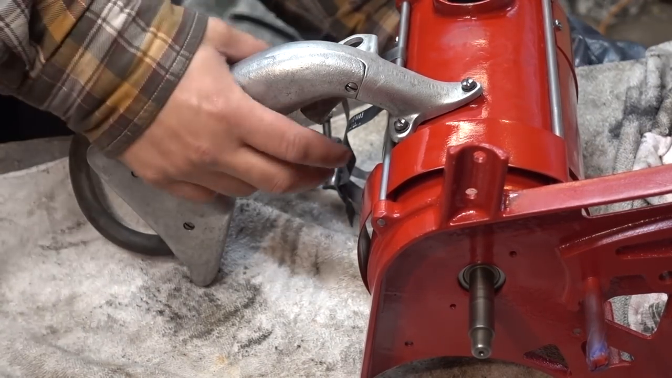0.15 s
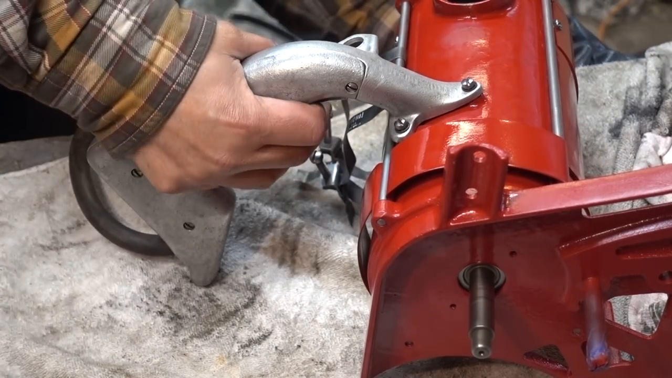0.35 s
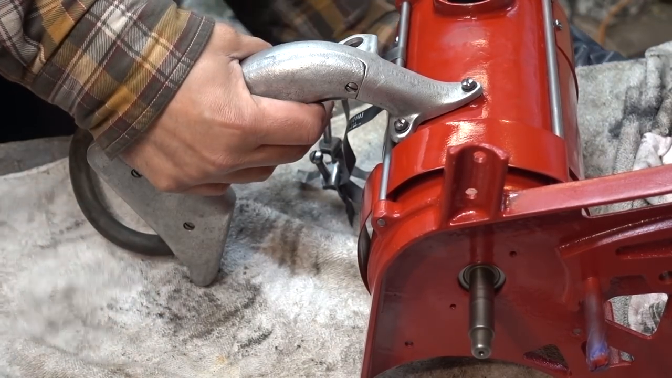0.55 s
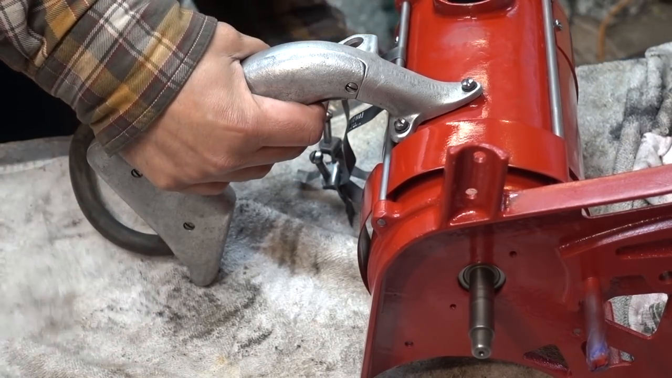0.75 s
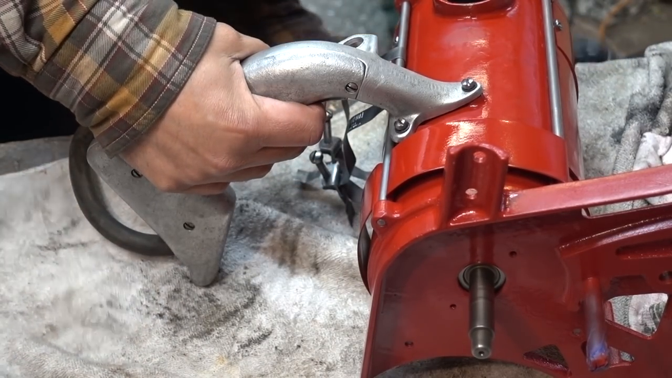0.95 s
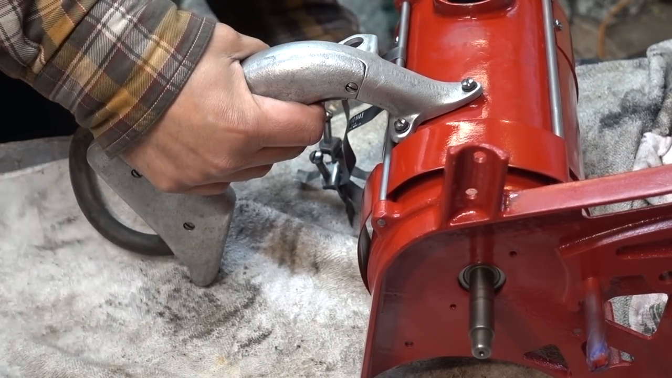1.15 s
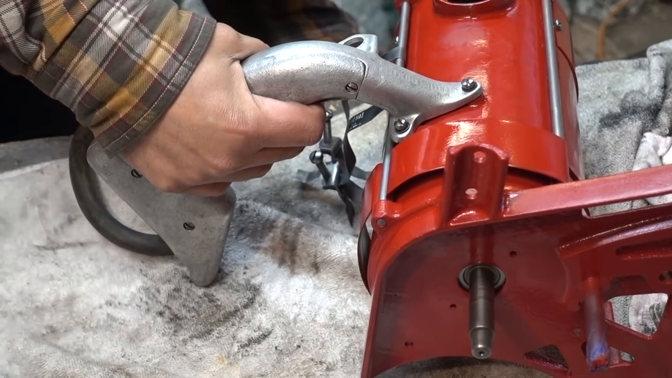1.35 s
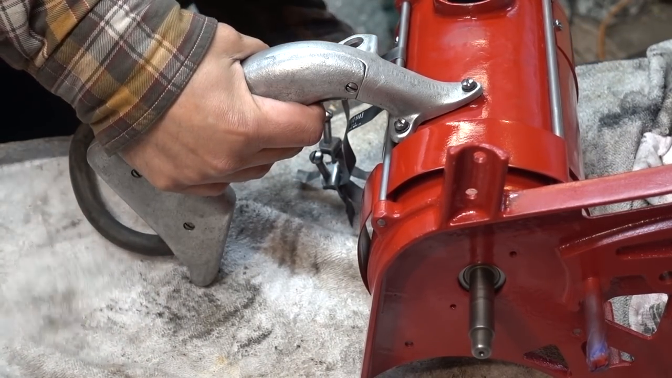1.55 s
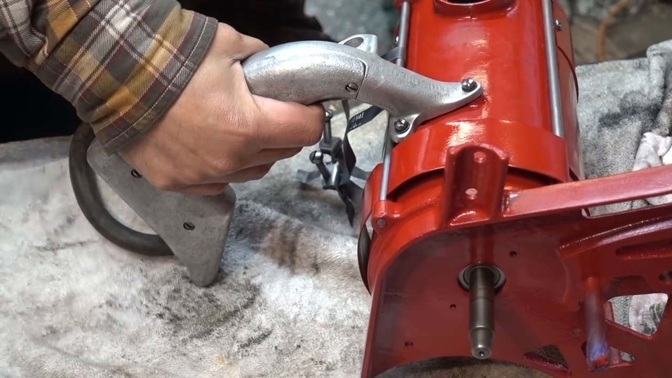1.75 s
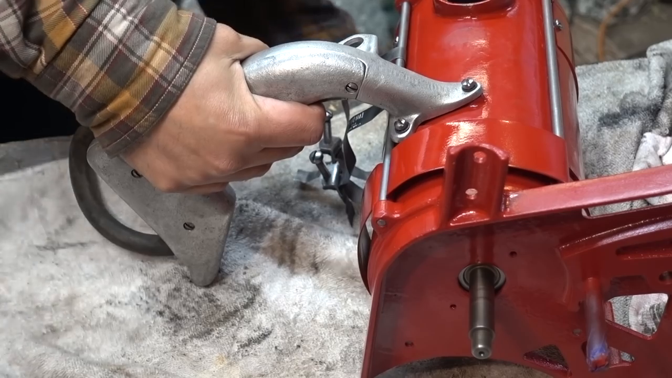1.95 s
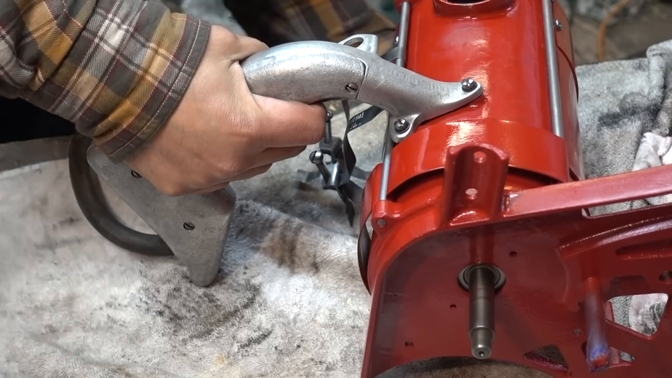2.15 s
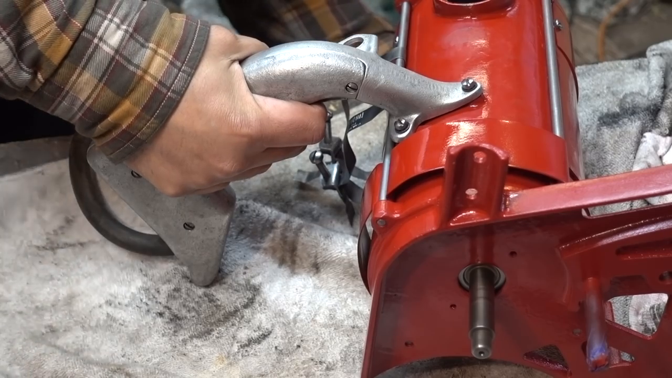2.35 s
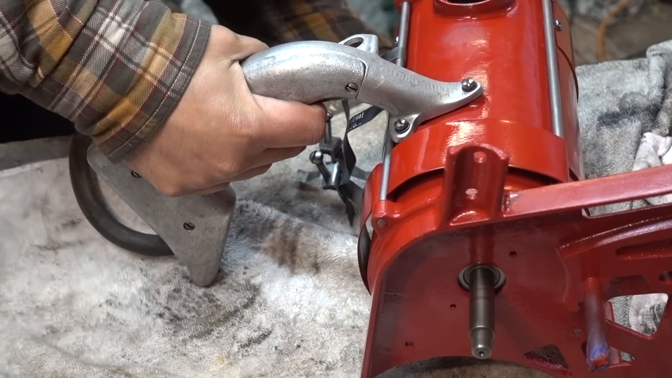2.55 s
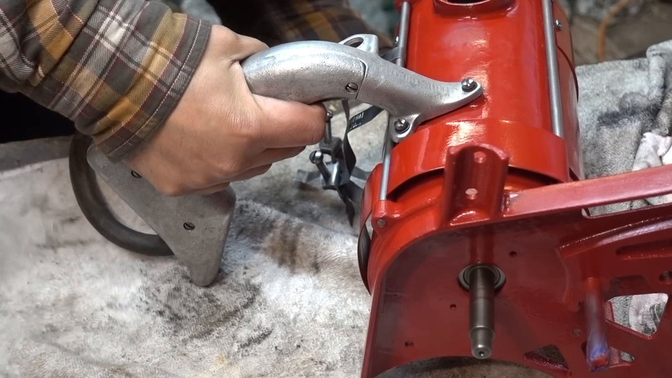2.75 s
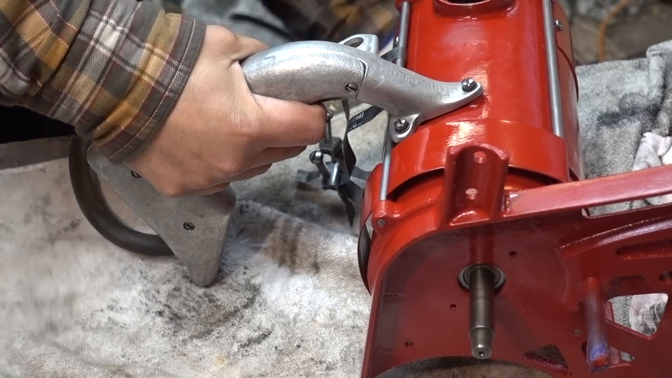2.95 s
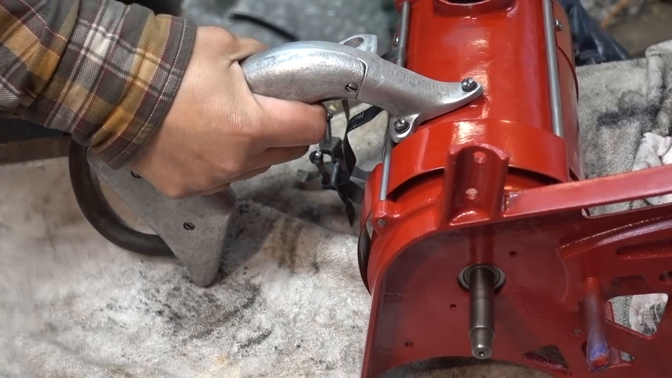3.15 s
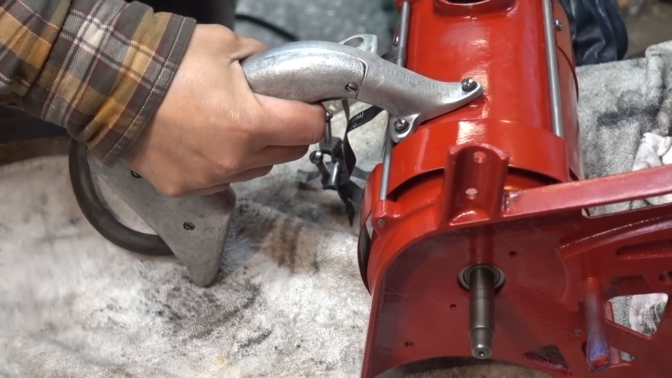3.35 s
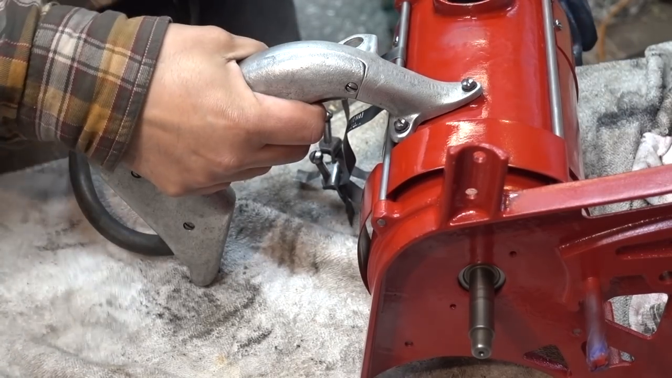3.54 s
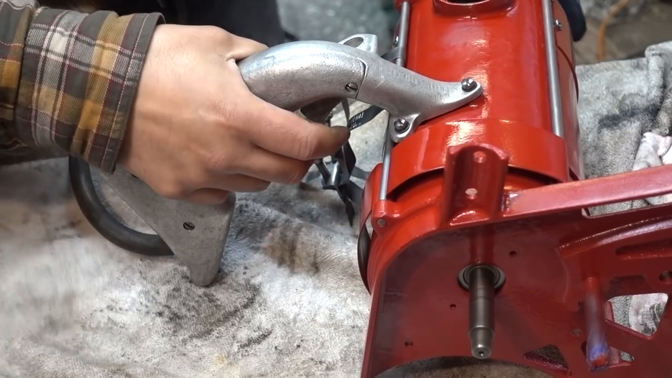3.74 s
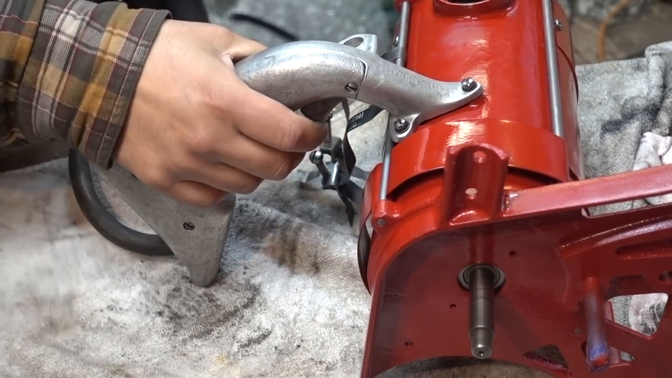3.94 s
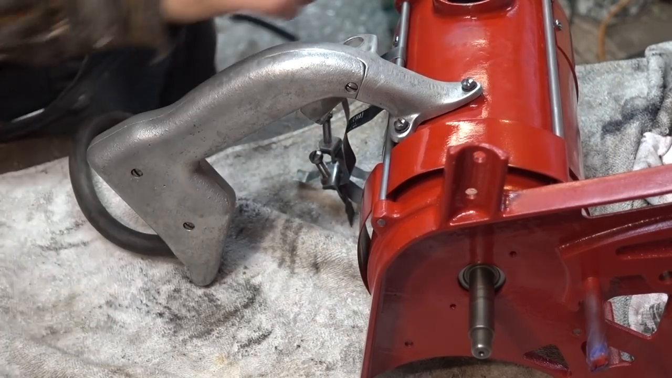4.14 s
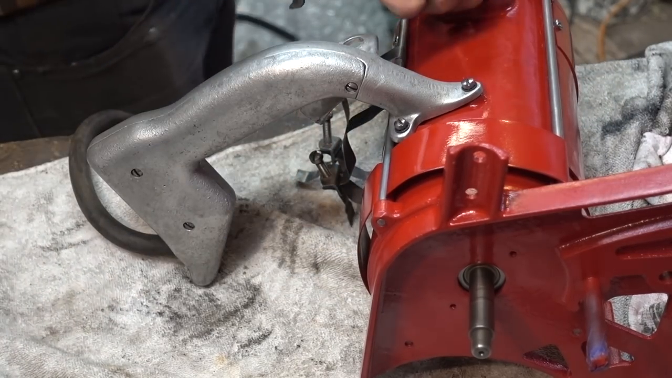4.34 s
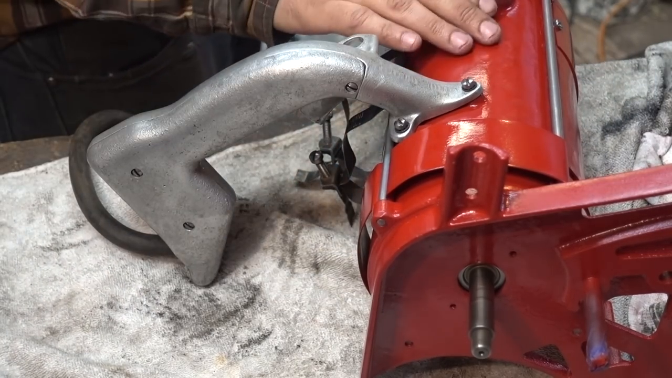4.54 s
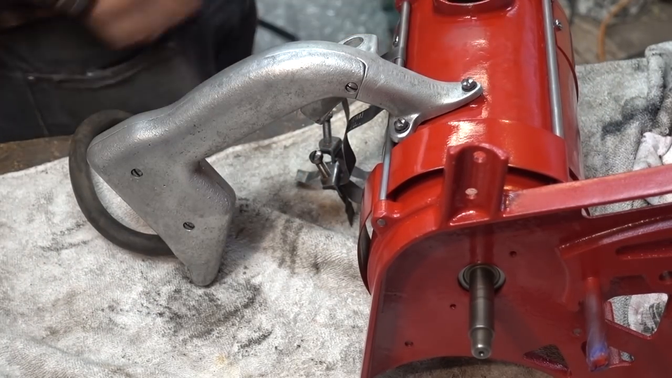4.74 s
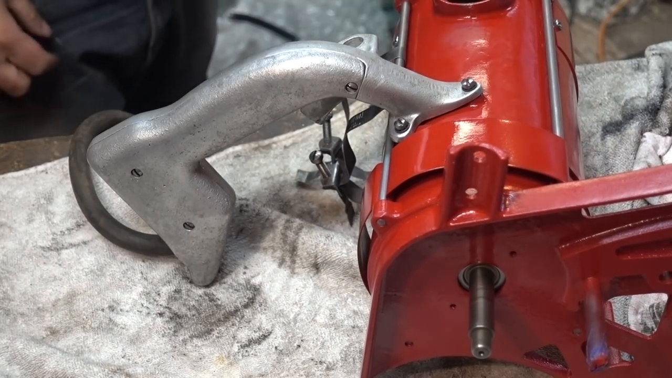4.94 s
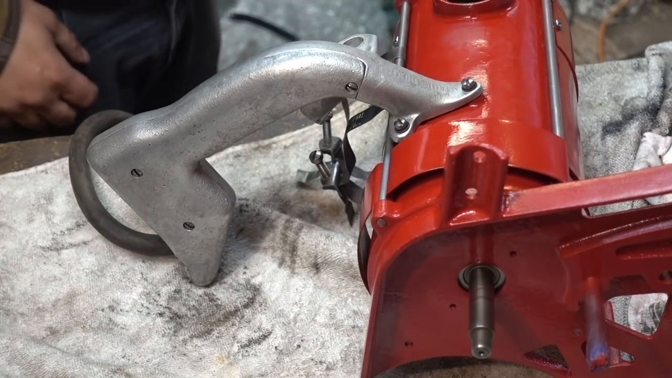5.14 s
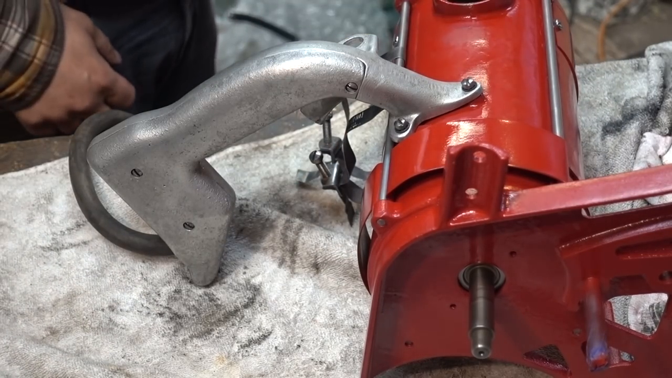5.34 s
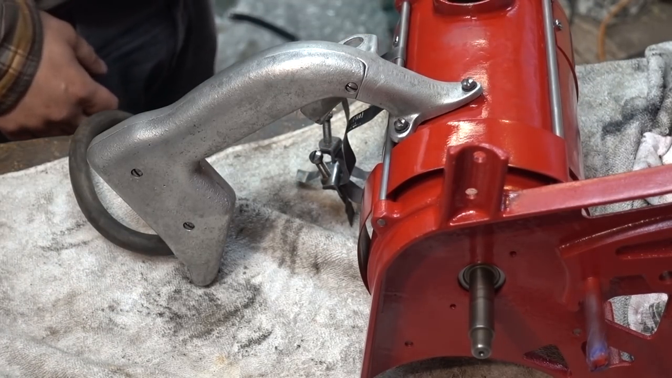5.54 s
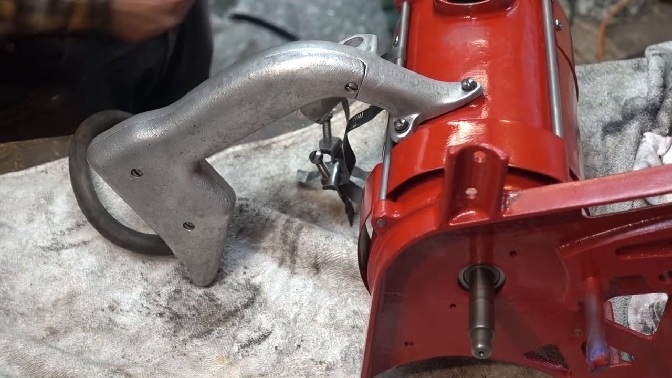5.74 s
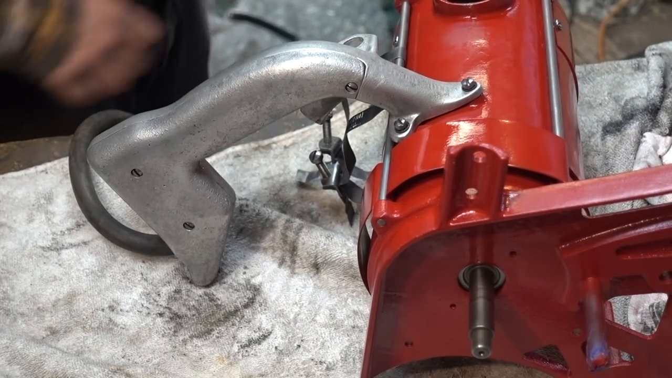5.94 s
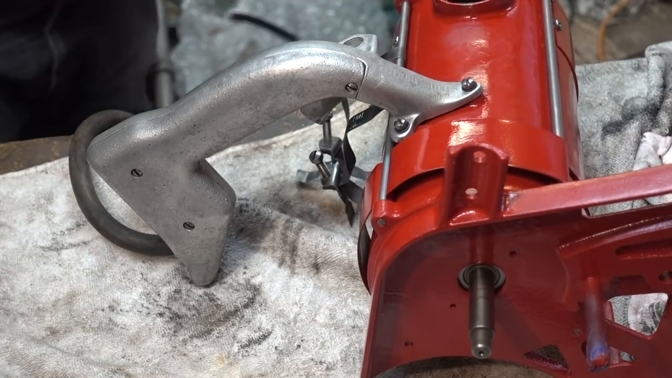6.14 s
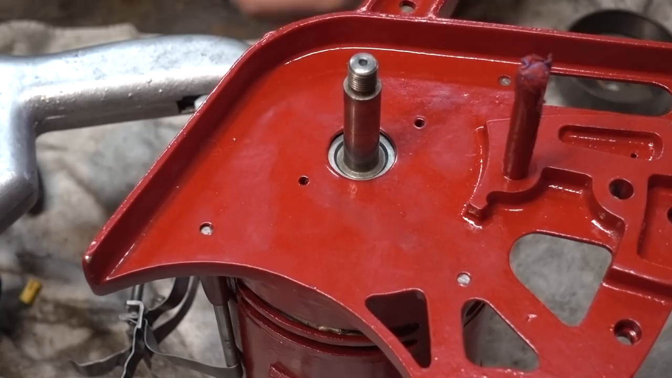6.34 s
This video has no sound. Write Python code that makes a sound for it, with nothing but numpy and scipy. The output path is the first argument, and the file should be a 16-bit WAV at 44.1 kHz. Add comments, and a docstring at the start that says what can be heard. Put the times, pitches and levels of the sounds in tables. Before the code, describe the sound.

Heard close up in a workshop, an electric chainsaw motor with no chain whirrs, briefly dropping in pitch, then climbs quickly to a steady whistling whine. Air blows from the vents and the brushes hiss and faintly crackle over a light rumble. The switch snaps softly open and the motor winds down, falling and fading, until the sound stops abruptly with a small, very high tick.

```python
"""Workshop bench, close by: the bare motor of an electric chainsaw. It is coasting when the trigger is
squeezed, spins up to a steady whine, winds down on release and cuts off; two tiny high ticks follow.
The ten-bladed cooling fan whistles through the resonances of housing and bench, air rushes from the
vents, carbon brushes hiss, spark and sing on the commutator, and the bearings rumble."""
import sys
import numpy as np
from scipy import signal
from scipy.fft import rfft, irfft, next_fast_len
from scipy.io import wavfile
from scipy.ndimage import uniform_filter1d

SR = 44100
rng = np.random.default_rng(int(sys.argv[2]) if len(sys.argv) > 2 else 0)


def to_wav(sig):
    """Store sig (one row per channel, or 1-D mono) as 16-bit WAV at the path in sys.argv[1].

    Samples outside -1..1 are clipped; the rate is SR.
    """
    pcm = np.clip(np.atleast_2d(sig), -1, 1) * 32767
    pcm = np.round(pcm).astype(np.int16)
    wavfile.write(sys.argv[1], SR, pcm.T)  # frames by channels


N = 286209
TIME = np.arange(N) / SR
ON_S, OFF_S, STOP_S = 0.42, 3.705, 6.358  # current on, current off, motor sound ends
TOP_RPS = 206.31  # top speed when cold, turns/s

# air rush spectrum: f/Hz, level/dB
RUSH_SPECTRUM = [(30, -63), (70, -39), (130, -49), (250, -10.5), (430, -8.5), (570, 3), (680, -1), (900, 1),
                 (1000, 3.5), (1110, 4), (1260, -13), (1600, -5.5)]
# brush hiss spectrum: f/Hz, level/dB
HISS_SPECTRUM = [(1800, -17), (2700, -15), (3200, -6), (3900, 1), (4600, -2.5), (5600, -4), (7000, -4.5),
                 (8600, -12.5), (10200, -13), (12000, -21.5), (15500, -31)]
# resonances of the motor's brush end: f/Hz, width/Hz, gain/dB, pan/dB
END_CAP_MODES = [(360, 14, -4, -7.5), (845, 45, -8, -2), (1420, 110, -1, 1.5), (1587, 55, 9, 0),
                 (1742, 62, 9.5, -2.5), (2124, 87, 7.5, -0.5), (2354, 81, 1, -2), (2920, 530, -15.5, -9),
                 (3920, 170, -2.5, 3), (4820, 510, -6, -10.5), (5510, 430, -12, 18.5),
                 (6340, 220, -11.5, -1.5), (9800, 200, -12.5, -1)]


def from_db(db):
    """Decibels to gain."""
    return 10 ** (np.asarray(db) / 20)


def rms_one(x):
    """Scale to rms 1."""
    return x / np.sqrt(np.mean(x ** 2) + 1e-20)


def tone(cycles):
    """Sine of rms 1."""
    return np.sqrt(2) * np.sin(2 * np.pi * cycles)


def butterworth(x, order, edge_hz, kind):
    """Causal Butterworth filter."""
    return signal.sosfilt(signal.butter(order, edge_hz, kind, fs=SR, output="sos"), x)


def in_time(rows):
    """One curve per column, interpolated over the times in the first."""
    times_s, *columns = np.transpose(rows)
    return [np.interp(TIME, times_s, column) for column in columns]


def panned(pan_db):
    """Stereo gains for a left-minus-right level."""
    return from_db(np.array([[.5], [-.5]]) * pan_db)


def by_speed(rps, full_db, knee_rps, power):
    """Level in dB: amplitude rises as a power of speed, flat above the knee."""
    return full_db - 5 * power * np.log10(1 + (knee_rps / rps) ** 4)


def drift(rate_hz, hop=40):
    """Smooth random curve of rms 1."""
    knots = rng.standard_normal(N // hop + 2002)
    pole = np.exp(-2 * np.pi * rate_hz * hop / SR)
    slow = signal.lfilter([1], [1, -2 * pole, pole * pole], knots)[2000:]
    return np.interp(np.arange(N) / hop, np.arange(len(slow)), rms_one(slow))


def coloured(spectrum):
    """Stereo noise of rms 1 from (f/Hz, level/dB) points; mono in the bass."""
    # likeness of left and right: f/Hz, correlation
    likeness = [(100, 1), (500, 1), (1000, 0.96), (2000, 0.91), (4000, 0.46), (8000, 0.48), (15000, 0.32)]
    size = next_fast_len(N)
    log_hz = np.log(np.fft.rfftfreq(size, 1 / SR) + 1)
    curves = np.transpose(spectrum), np.transpose(likeness)
    level_db, alike = (np.interp(log_hz, np.log(hz), values) for hz, values in curves)
    below = np.maximum(np.log(spectrum[0][0]) - log_hz, 0)
    above = np.maximum(log_hz - np.log(spectrum[-1][0]), 0)
    mid, side = rfft(rng.standard_normal((2, size))) * from_db(level_db - 41 * (below + above))
    stereo = np.sqrt(1 + alike) * mid + np.sqrt(1 - alike) * side * [[1], [-1]]
    return rms_one(irfft(stereo, size)[:, :N])


def resonate(x, modes):
    """Parallel resonances, each radiating in its own direction."""
    out = np.zeros((2, N))
    for hz, width_hz, gain_db, pan_db in modes:
        r = np.exp(-np.pi * width_hz / SR)
        feedback = [1, -2 * r * np.cos(2 * np.pi * hz / SR), r * r]
        band = signal.lfilter([1, 0, -1], feedback, x) * (1 - r * r) / 2
        out += from_db(gain_db) * panned(pan_db) * band
    return out


def reflections(x, t60_s, count=24):
    """Echoes off bench, tools and walls, separate per ear; a gliding tone flutters in them."""
    out = np.zeros((2, N))
    for ear, source in zip(out, np.broadcast_to(x, (2, N))):
        delays_s = rng.uniform(.002, .06, count)
        gains = from_db(-60 * delays_s / t60_s) * rng.choice([-1, 1], count)
        for lag, gain in zip((delays_s * SR).astype(int), gains / np.linalg.norm(gains)):
            ear[lag:] += gain * source[:N - lag]
    return out


def coast(start_rps, age_s, drag_share=.5361, drag_s=1.1328, friction_rps_per_s=32.19):
    """Without current, air drag and friction slow the rotor."""
    return start_rps * (1 - drag_share * (1 - np.exp(-age_s / drag_s))) - friction_rps_per_s * age_s


def rotor_speed(start_rps=172.9, creep_rps_per_s=.693):
    """Turns/s: coasting, driven and creeping faster as the motor warms, coasting again."""
    # quick and slow stage of the run-up: gap to top speed/rps, time constant/s
    stages = [(25.3, .1221), (48.49, .3753)]
    age_s = TIME - ON_S
    gap_rps = sum(gap * np.exp(-age_s / lag_s) for gap, lag_s in stages)
    driven_rps = TOP_RPS + creep_rps_per_s * age_s - gap_rps
    rps = np.maximum(coast(start_rps, TIME), driven_rps)
    rps = np.where(TIME < OFF_S, rps, coast(rps[int(OFF_S * SR)], TIME - OFF_S))
    return uniform_filter1d(rps, size=1500, mode="nearest")


def fan(turns, rps, gliding, blades=10, jitter_cycles=0.0047, stall_rps=51):
    """Blades chop the air: a strong whistle and weaker overtones, ruffled by turbulence."""
    # whistle as the hand moves about the housing: t/s, gain/dB, pan/dB
    hand_whistle = [(0.0, 10.5, 8.5), (0.12, -3.5, 0.5), (0.22, 7.5, -3), (0.4, 1, 5.5), (0.5, 3, -1),
                    (0.72, 1.4, 5), (0.85, -3, -6), (1.07, 11.5, -2.3), (1.45, 9, 6), (1.65, 9.0, 10.5),
                    (1.9, 5.5, 12), (2.4, 6, 8.5), (2.7, 6.5, 4.5), (3.1, 3.5, 1), (3.3, 4, -2),
                    (3.7, -0.2, -3), (3.8, -4.5, -2), (4.04, -4, 2), (4.08, 11, -1.5), (4.18, -8, 2),
                    (4.27, 5.5, -4.5), (4.38, -4, 0.5), (4.9, -4.5, 3), (5.4, 1, 0)]
    # overtones as the hand moves: t/s, 2nd/dB, 3rd/dB, 4th/dB
    hand_overtones = [(0, -2, 7, -5), (.14, 2.5, -2, 1), (.3, -1, -8, -8), (.6, 0, 1, -5), (.82, 1.5, 0, 7),
                      (1.0, 0, 2.5, 0), (1.15, 0, 3, 2), (1.7, 2, 1.5, -3), (2.6, -1, 0, -4),
                      (3.0, -3.5, 2.5, 3), (3.3, 1, 1, 4), (3.6, -1.5, 0, 5), (3.87, 1.5, 2.5, -1),
                      (4.1, -0.5, 4, 0), (4.5, 1, 2, -3.5)]
    # brief flares and dips of the gliding whistle: t/s, gain/dB, half length/s
    flares = [(0.069, -19, 0.0075), (0.148, -19, 0.0048), (0.177, 6, 0.005), (0.223, -1, 0.0037),
              (0.231, -8.5, 0.0073), (0.261, 4.5, 0.008), (.44, -3, .008), (0.457, 4, .008),
              (0.474, -7, 0.0055), (0.491, 7.5, 0.0061), (0.512, 2, .008), (0.56, 2.5, .03),
              (0.672, -4, 0.0069), (0.703, 5, 0.013), (3.877, 4.5, 0.021), (4.068, -4, .008),
              (4.071, 10.5, 0.0031), (4.167, -15, 0.0067)]
    # housing and bench resonances: f/Hz, width/Hz, gain/dB, pan/dB
    housing_modes = [(574.6, 31.3, -22.0, -0.7), (638.2, 33.7, -9.3, -1.0), (739.4, 32.6, -10.4, 1.7),
                     (987.5, 23.0, -4.2, -1.3), (1103.5, 28.5, -9.5, 4.0), (1244.0, 14.3, 0.6, 0.9),
                     (1303.5, 26.2, -6.0, -3.9), (1357.0, 36.1, -20.8, -8.0), (1423.6, 18.8, -9.8, 4.7),
                     (1460.8, 13.8, -15.3, 7.9), (1476.4, 20.0, -3.4, 6.7), (1511.4, 27.6, -4.3, -0.2),
                     (1543.6, 22.8, -4.0, -2.7), (1578.5, 9.0, -23.5, 2.4), (1627.2, 34.9, -14.9, -17.8),
                     (1657.9, 10.5, -18.0, -5.9), (1680.4, 9.0, -16.5, -3.3), (1719.6, 12.0, -11.3, -3.9),
                     (1745.8, 25.5, -12.0, 9.0), (1808.6, 16.7, -4.1, 1.6), (1881.3, 15.8, -17.3, -0.7),
                     (1915.9, 37.4, -17.5, 15.4), (1984.3, 41.3, -21.0, 9.9), (2031.1, 46.2, -18.9, 0.2),
                     (2098.2, 35.4, -10.0, 6.7)]
    # shroud and room resonances, plus one broad band of direct sound: f/Hz, width/Hz, gain/dB, pan/dB
    overtone_bands = [(2900, 95, 1, -4), (3174, 19, -2, -17), (3306, 37, 12.5, 2), (3485, 13, 18.5, -11),
                      (3771, 38, 15, -7), (4068.6, 9, 8.5, 11), (4146.2, 9.4, 10.6, -9), (4167, 8, .5, -14),
                      (4675, 2000, -8, 10), (5070, 70, 9, -11), (5628, 14, 28.5, 0), (5783, 24, 24, -8),
                      (5873, 12, 9, 20), (6020, 28, 9, -8), (6099, 9, 11, 1.5), (6181, 12, 5, -3),
                      (6270, 56, 8.5, -3)]
    hand_db, pan_db = in_time(hand_whistle)
    level_db = by_speed(rps, -21.5, knee_rps=223, power=1.78) + hand_db
    level_db += 0.14 * drift(3.2) + 0.74 * (1 + gliding) * drift(180)  # sway and grit
    level_db += sum(db * np.exp(-((TIME - s) / half_s) ** 2) for s, db, half_s in flares)
    passes = blades * turns + jitter_cycles * drift(40)
    flutter_db = 0.7 + 0.78 * gliding
    level_db += flutter_db * drift(17)
    whistle = resonate(tone(passes), housing_modes) * from_db(level_db) * panned(pan_db)

    second_db = by_speed(rps, -58, knee_rps=168, power=1.9)
    upper_db = by_speed(rps, -60, knee_rps=223, power=3.95)
    hand2_db, hand3_db, hand4_db = in_time(hand_overtones)
    levels_db = [second_db + hand2_db, upper_db + hand3_db, upper_db - 8.5 + hand4_db, upper_db - 11.5]
    second, third, *faint = [from_db(db + 2 * flutter_db * drift(26.4)) * tone(k * passes)
                             for k, db in enumerate(levels_db, 2)]
    overtones = resonate(second + third, overtone_bands) + sum(faint)
    # echoes beat against the direct tone only while its pitch moves
    echoes = reflections(gliding * (from_db(-21) * whistle + from_db(-12) * overtones), t60_s=0.38)
    blowing = 1 / (1 + (stall_rps / rps) ** 6)  # a slow fan stalls
    return blowing * (whistle + overtones + echoes)


def air(rps, gliding, swell_db, gust_db=0.85, hollow_db=-4):
    """Cooling air rushes from the vents and rings the hollows of the housing."""
    # cavity resonances: f/Hz, width/Hz, gain/dB, pan/dB
    hollow_modes = [(572, 140, -8, 1.5), (1024, 8.3, 6.5, -0.5), (1099, 19, 5, -0.5), (1258, 23, 3.5, -1.5),
                    (1314, 28, -1.5, -1.5)]
    hollow = rms_one(resonate(rng.standard_normal(N), hollow_modes))
    hollow = butterworth(hollow, 2, 400, "high")  # a small housing radiates no bass
    level_db = by_speed(rps, -50.5, knee_rps=95.6, power=3.1) + 0.91 * swell_db + 1.5 * gliding
    level_db += gust_db * drift(5.2)
    return from_db(level_db) * (coloured(RUSH_SPECTRUM) + from_db(hollow_db) * hollow)


def brushes(turns, rps, gliding, swell_db, bars=16, ball_passes_per_turn=5.3):
    """Carbon rubs the commutator: gritty noise throbbing each turn, a rough tone from the bar edges."""
    # scrape spectrum: f/Hz, level/dB
    scrape_spectrum = [(700, -24.5), (1150, -10), (1290, 1), (1420, -4), (1600, -2), (1900, -2.5),
                       (2150, -7), (2500, -6.5), (2900, -12), (4500, -19)]
    # bar tone coming and going: t/s, fundamental/dB, octave/dB
    bar_levels = [(0, -66, -68), (.8, -51.5, -65), (1.2, -55.5, -75), (3.6, -58, -71), (4.0, -60, -67),
                  (4.6, -64, -65), (4.95, -75, -61), (5.08, -50, -60), (5.22, -56.5, -72), (5.36, -70, -71),
                  (5.48, -58, -77), (5.66, -52, -65), (5.78, -72.5, -60.5), (6.1, -62, -61),
                  (6.33, -61, -70)]
    # thin rasp while the speed changes: multiple of bar rate, level/dB
    rasp_harmonics = [(3, -69.5), (4, -73), (5, -80)]
    scrape_db = np.maximum(by_speed(rps, -45, knee_rps=130, power=4), -71) + swell_db
    hiss_db = by_speed(rps, -47, knee_rps=305, power=1.6) + swell_db
    throb = 1 + 0.067 * np.sin(2 * np.pi * turns)
    pressure = throb * from_db(1.26 * drift(230) + .5 * drift(23))
    scrape = from_db(scrape_db) * coloured(scrape_spectrum)
    hiss = from_db(hiss_db) * coloured(HISS_SPECTRUM)

    passes = bars * turns + .011 * drift(70)  # brushes chatter in their holders
    passes += .032 * np.sin(2 * np.pi * turns)  # commutator out of round
    passes += .029 * np.sin(2 * np.pi * ball_passes_per_turn * turns)  # bearing balls nudge it
    edges = sum(from_db(db + 2 * drift(40)) * tone(k * passes)
                for k, db in enumerate(in_time(bar_levels), 1))
    rasp = gliding * sum(from_db(db) * tone(k * passes) for k, db in rasp_harmonics)
    rasp = butterworth(rasp, 3, 7500, "low")
    friction = from_db(-52) * pressure * rng.standard_normal(N)
    song = resonate(edges + friction, END_CAP_MODES)
    echoes = reflections(from_db(-11.5) * song, t60_s=0.28) + reflections(rasp, t60_s=.05)
    return pressure * (scrape + hiss) + song + echoes


def whirr(turns, rps, gliding, memory=.86, points=200):
    """Fine scratches pass under the two brushes and wear into new ones, ringing the end cap."""
    # one row per half turn; the share `memory` survives to the next brush
    fresh = rng.standard_normal((int(2 * turns[-1]) + 2, points))
    surface = signal.lfilter([1], [1, -memory], fresh, axis=0).ravel()
    scratches = np.interp(2 * turns * points, np.arange(len(surface)), surface)
    rasp = butterworth(scratches, 3, [2400, 7500], "band")
    echoes = from_db(-4) * reflections(rasp, t60_s=0.027)
    level_db = by_speed(rps, -66, knee_rps=70, power=1.4) + 8 * gliding
    return from_db(level_db) * rms_one(resonate(rasp, END_CAP_MODES) + echoes)


def sparks(rps, swell_db, per_turn=1.4, spread_db=2.0):
    """Fine crackle at the brushes, louder with speed and whenever the motor's noises swell."""
    level_db = by_speed(rps, -61.5, knee_rps=85, power=0.85) + 5.2 * swell_db
    level_db += spread_db * np.minimum(rng.exponential(1, N), 3)
    sizes = from_db(level_db) * rng.choice([-1, 1], N)
    arcs = sizes * (rng.random(N) < per_turn * rps / SR)
    crackle = butterworth(arcs + 1e-18, 1, [3000, 9000], "band")
    return crackle + from_db(2.0) * reflections(crackle, t60_s=.15)


def dull_when_slow(x, rps, edge_hz=11500):
    """The top of the brush noise fades as the sliding slows."""
    dull = signal.sosfiltfilt(signal.butter(4, edge_hz, fs=SR, output="sos"), x)
    return dull + (x - dull) * np.sqrt(rps / TOP_RPS)


def bearings(turns, rps, gliding, swell_db, lumpy_db=1.4):
    """Unbalance hums and bearing play knocks, both booming in the bench; balls rumble in their races."""
    # knock: multiple of turn rate, level/dB
    knock_harmonics = [(2, -80), (3, -76), (4, -82), (5, -79), (6, -79), (7, -86), (8, -85)]
    # bench resonances: f/Hz, width/Hz, gain/dB, pan/dB
    bench_modes = [(157, 12, 6, 0), (272, 28, 9, 0), (368, 24, 11, 0)]
    # ball rumble spectrum: f/Hz, level/dB
    rumble_spectrum = [(60, -35), (110, -24.5), (165, -5), (205, -6), (270, 3.5), (320, 3.5), (370, -3.5),
                       (450, -8.5)]
    # the hum wavers and weakens while the speed changes, most in the run-up
    loss_db = 3.0 + 4.5 * (np.gradient(rps) > 0)
    hum_db = by_speed(rps, -65, knee_rps=191, power=5.5) + gliding * (5.0 * drift(6.3) - loss_db)
    hum = from_db(hum_db) * tone(turns)
    knock = sum(from_db(db + gliding + lumpy_db * drift(12)) * tone(k * turns)
                for k, db in knock_harmonics)
    knock = butterworth(knock, 4, 250, "high")
    rumble_db = by_speed(rps, -73, knee_rps=56, power=1.2) + 0.5 * gliding + 0.96 * swell_db
    rumble = from_db(rumble_db + lumpy_db * drift(8)) * coloured(rumble_spectrum)
    return hum + resonate(hum + knock, bench_modes) + rumble


def last_rub(peak_db=-62, grow_s=0.29, ring_hz=2160, width_hz=70):
    """Just before the stop the brushes drag and ring the end cap."""
    ring = rms_one(resonate(rng.standard_normal(N), [(ring_hz, width_hz, 0, 0)]))
    return from_db(peak_db) * np.exp(np.minimum(TIME - STOP_S, 0) / grow_s) * ring


def trigger(t60_s=.04):
    """The trigger contact snaps shut, later open."""
    # snaps: t/s, level/dB
    snaps = [(.405, -56), (3.73, -50)]
    envelope = sum(from_db(db - 60 * np.abs(TIME - s) / t60_s) * (TIME >= s) for s, db in snaps)
    return butterworth(envelope * rng.standard_normal((2, N)) + 1e-18, 1, [1500, 11000], "band")


def ticks(rise_s=0.002, scuff_db=-66, scuff_t60_s=0.091):
    """Each tick is a faint dry scuff with a brief, very high ring."""
    # ticks: t/s, ring level/dB
    onsets = [(6.404, -63.5), (6.422, -40)]
    # ring: f/Hz, level/dB, t60/s
    modes = [(11000, -3, 0.029), (13800, -29.5, .02)]
    ringing, scuff_envelope = np.zeros(N), np.zeros(N)
    for start_s, db in onsets:
        age_s = np.maximum(TIME - start_s, 0)
        attack = np.tanh(age_s / rise_s)
        for hz, mode_db, t60_s in modes:
            ringing += attack * from_db(db + mode_db - 60 * age_s / t60_s) * tone(hz * age_s)
        scuff_envelope += attack * from_db(scuff_db - 60 * age_s / scuff_t60_s)
    scuff_noise = coloured([(1500, -18), (2400, 0), (3300, -9), (4500, -19), (10000, -15)])
    return ringing + scuff_envelope * scuff_noise


def noise_floor():
    """Very faint steady rush and hiss."""
    return from_db(-88.5) * (coloured(RUSH_SPECTRUM) + coloured(HISS_SPECTRUM))


def scene():
    """One rotor drives fan, brushes and bearings; their levels follow its speed."""
    # common swell of the motor's noises: t/s, level/dB
    swell = [(0, 4), (.2, 1.5), (.4, 2.5), (.52, 3.5), (.65, 1), (.82, 5), (1, 5), (1.15, 1), (2.1, 1.5),
             (3.3, -1.2), (3.95, 2.5), (4.6, 1), (6.35, 6)]
    swell_db, = in_time(swell)
    rps = rotor_speed()
    turns = np.cumsum(rps) / SR
    gliding = np.tanh(np.abs(np.gradient(rps)) * SR / 25)  # 0 at steady speed, 1 in fast change
    contact = brushes(turns, rps, gliding, swell_db) + whirr(turns, rps, gliding) + sparks(rps, swell_db)
    motor = fan(turns, rps, gliding) + air(rps, gliding, swell_db) + dull_when_slow(contact, rps)
    motor += bearings(turns, rps, gliding, swell_db) + last_rub()
    gate = np.clip(np.minimum(TIME, STOP_S - TIME) / 0.0019, 0, 1)
    return motor * gate + trigger() + ticks() + noise_floor()


def record(dry, low_hz=75, high_hz=15700):
    """Deep bass rolled off, top cut steeply."""
    thin = butterworth(dry, 2, low_hz, "high")
    return signal.sosfilt(signal.ellip(10, .1, 80, high_hz, fs=SR, output="sos"), thin)


dry = scene()
out = record(dry)
to_wav(out)
```